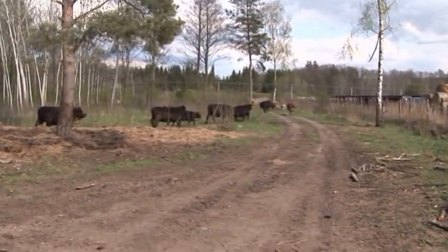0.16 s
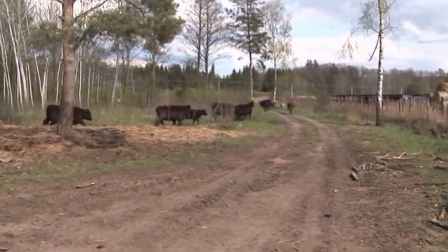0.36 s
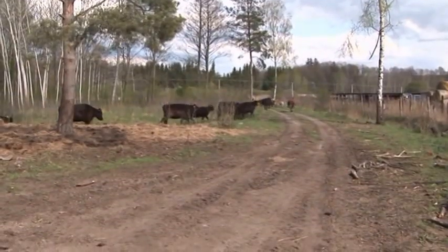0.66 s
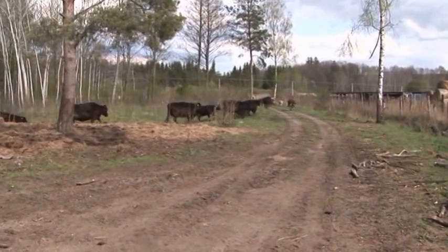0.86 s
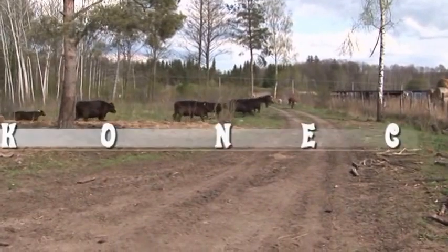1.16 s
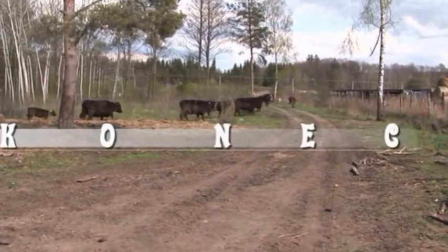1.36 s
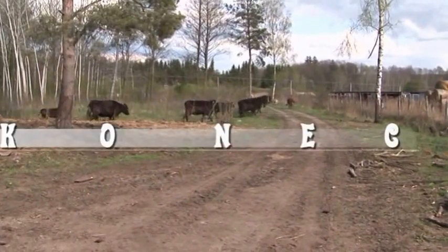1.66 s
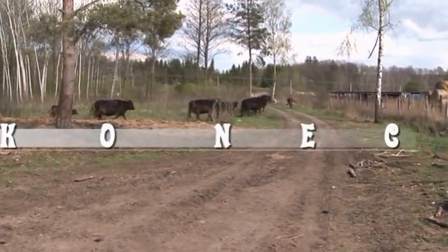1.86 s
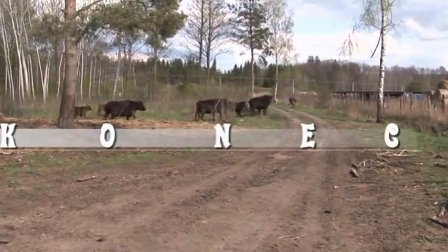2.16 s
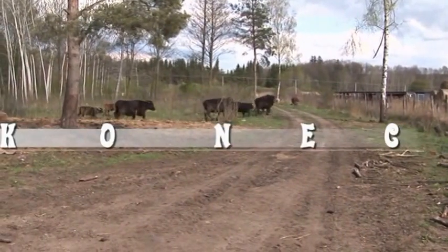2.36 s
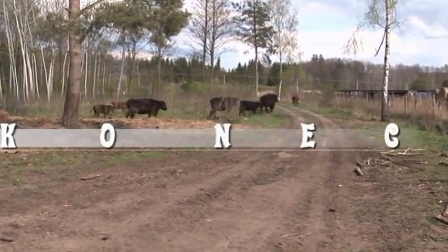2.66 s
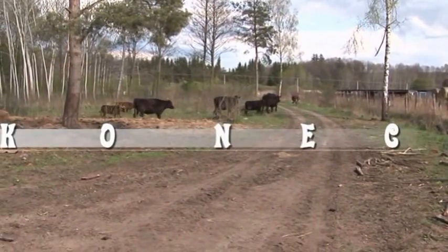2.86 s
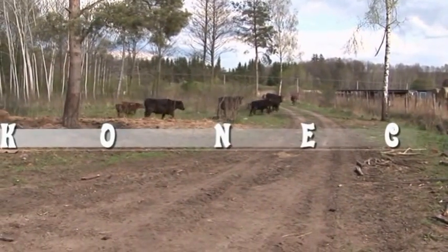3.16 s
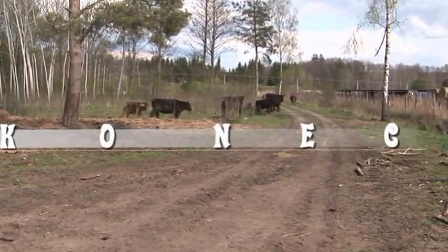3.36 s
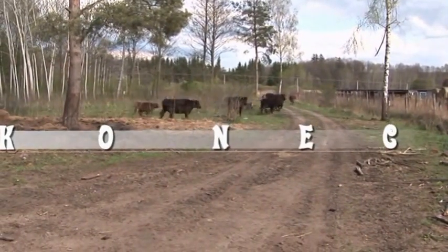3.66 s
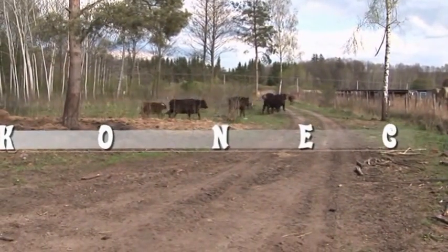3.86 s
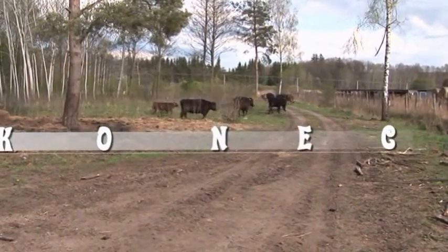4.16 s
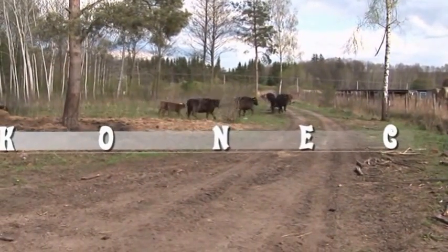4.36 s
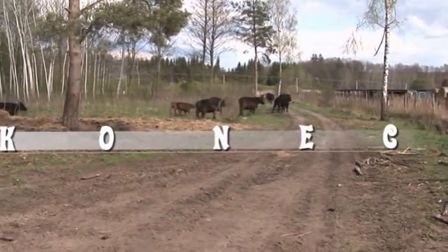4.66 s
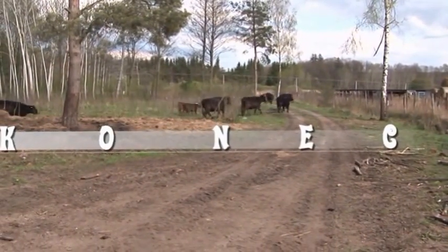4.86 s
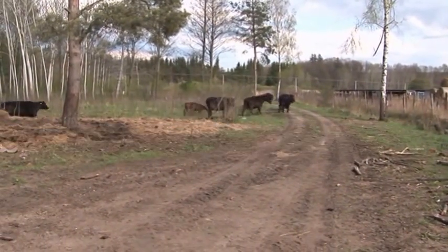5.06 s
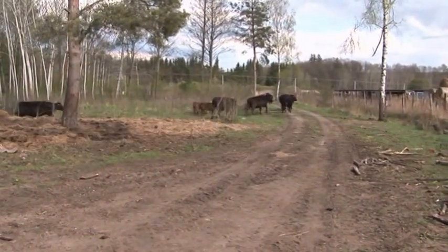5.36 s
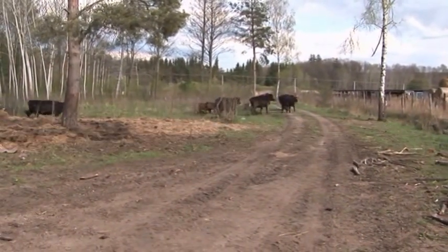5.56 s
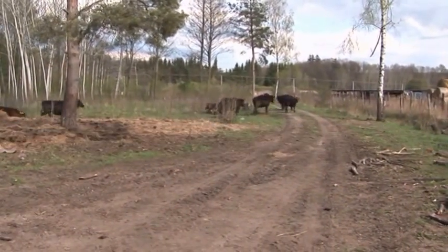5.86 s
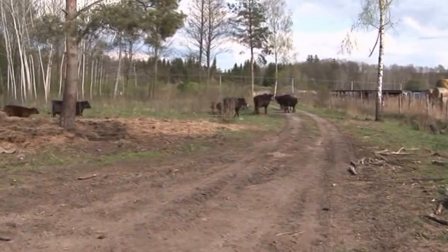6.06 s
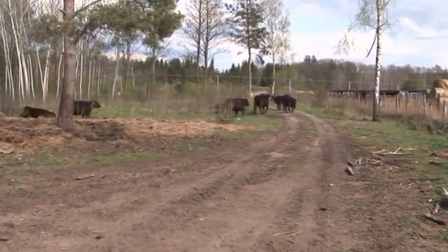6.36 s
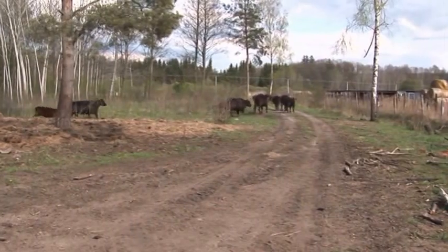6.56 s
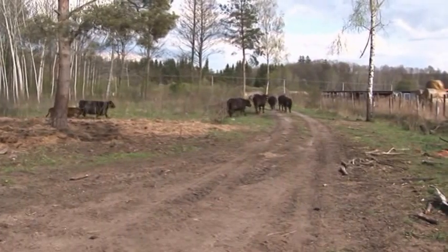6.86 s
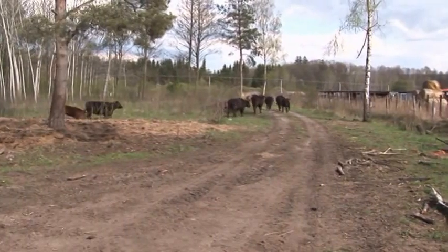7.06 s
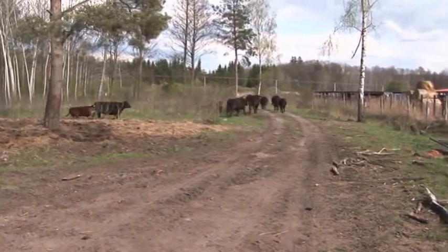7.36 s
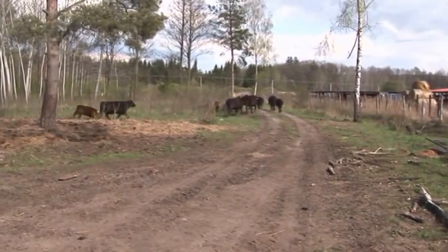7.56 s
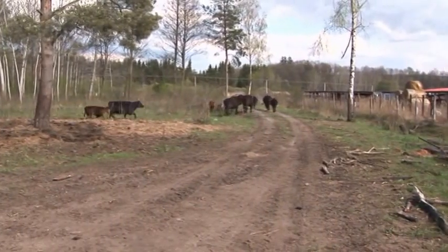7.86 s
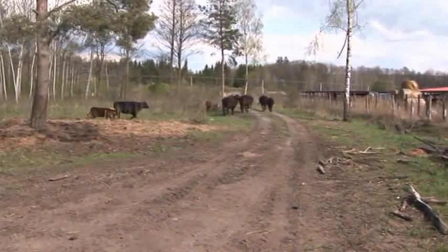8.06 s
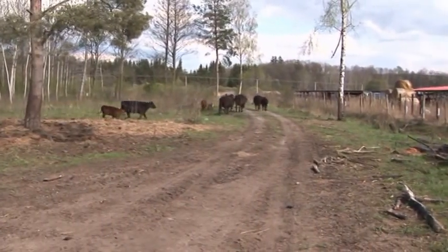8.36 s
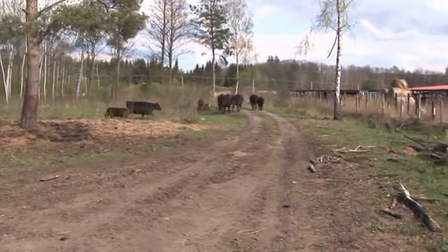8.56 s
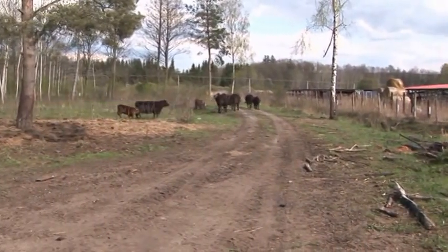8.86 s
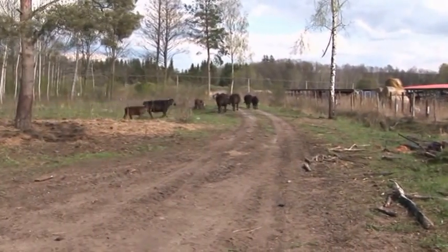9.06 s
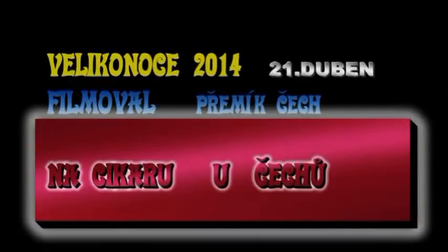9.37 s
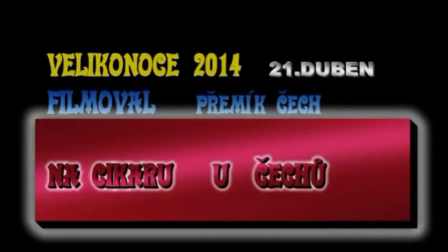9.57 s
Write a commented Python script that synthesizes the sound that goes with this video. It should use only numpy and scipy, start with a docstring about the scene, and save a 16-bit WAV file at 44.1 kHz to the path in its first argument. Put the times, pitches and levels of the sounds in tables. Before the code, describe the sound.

Cattle bellow at a distance throughout, slightly to the right, in overlapping, arching calls that echo from trees and blur into a hoarse wash. A strong, high call opens the first 0.7 seconds, and another high, raspy one comes at 3 seconds. Underneath, a diesel engine idles with a low rumble and light knocking to the left, over soft outdoor air. Dry twigs crackle, mostly in the first five seconds, and hooves knock on wood near 1.8, 4.3, 4.7 and 7 seconds. A small bird chirps faintly around 3 and 5.5 seconds. At about 4.6 seconds a close cow, straight ahead, growls upward into a short hoot at 5.3. It growls again and breaks into the loudest, low closed-mouth hoot from 6.8 to 7.2, then another from 8.2 to 8.7. A last brief growl comes just after 9 seconds.

```python
"""Cattle on a farm track by a wood

Far cows bellow in overlapping arcs that echo from the trees; a near cow growls upward and breaks into
loud, closed-mouth hoots. Each call is a stack of vocal-fold harmonics shaped by the mouth.
A diesel engine idles with exhaust rumble and cylinder knock. Dry twigs crackle, hooves knock on
branches and a small bird chirps over steady air."""
import sys
import numpy as np
from scipy import signal
from scipy.fft import rfft, irfft, next_fast_len
from scipy.io import wavfile

SR = 44100
rng = np.random.default_rng(int(sys.argv[2]) if len(sys.argv) > 2 else 0)


def log_audio(samples):
    """Write samples as a 16-bit WAV file to the path given in sys.argv[1]."""
    # one column per channel
    frames = np.atleast_2d(samples).T
    # limit to full scale, then quantise
    limited = np.clip(frames, -1, 1)
    pcm = np.round(limited * 32767).astype(np.int16)
    wavfile.write(sys.argv[1], SR, pcm)


N = 428211
TIME = np.arange(N) / SR
FFT_SIZE = next_fast_len(N + SR)
BINS_HZ = np.maximum(np.fft.rfftfreq(FFT_SIZE, 1 / SR), 1)
END_S = 9.248
CYCLE_HZ = 5.738   # four-stroke cycle rate
EDGE_DB = 16.5   # level drop at the edge of a call


def from_db(db):
    """Decibels to gain."""
    return 10 ** (np.asarray(db) / 20)


def rms_one(x):
    """Scale to unit power."""
    return x / np.sqrt(np.mean(x ** 2) + 1e-20)


def at_hz(points, hz):
    """Interpolate on a log-frequency axis."""
    known_hz, values = np.transpose(points)
    return np.interp(np.log(hz), np.log(known_hz), values)


def filtered(x, response):
    """Apply a response given on BINS_HZ."""
    return irfft(rfft(x, FFT_SIZE) * response, FFT_SIZE)[..., :N]


def pan(side_db):
    """Constant-power stereo gains; side_db is left minus right."""
    return rms_one(from_db(np.array([[side_db], [-side_db]]) / 2))


def wander(t, rate_hz):
    """Random drift between unit-normal knots."""
    knots = rng.standard_normal(4096)
    return np.interp((t - t[0]) * rate_hz, np.arange(len(knots)), knots)


def ramp(distance_s, length_s):
    """1 at the edge of a call, 0 from length_s on."""
    return np.clip(1 - distance_s / max(length_s, 1e-3), 0, 1)


def noise(colour, correlation, side_db):
    """Coloured stereo noise of unit power."""
    mid, side = rng.standard_normal((2, N))
    pair = np.sqrt(1 + correlation) * mid + np.sqrt(1 - correlation) * side * [[1], [-1]]
    return pan(side_db) * rms_one(filtered(pair, from_db(at_hz(colour, BINS_HZ))))


def air():
    """Steady air: mostly low noise."""
    # spectrum: (frequency [Hz], relative density [dB])
    colour = [(20, -22.5), (70, 0), (130, -3), (280, -1), (400, -12.5), (1000, -8), (3000, -22.5),
              (4000, -19), (7000, -52), (11500, -31.5), (15500, -51.5)]
    return noise(colour, correlation=1, side_db=3)


def herd_blur():
    """Voices scattered among the trees merge into a hoarse wash."""
    # envelope: (time [s], relative level [dB])
    envelope = [(0, -20.5), (.4, -21.5), (.7, -21.5), (1.55, -20.5), (2.2, -22.5), (2.7, -20.5),
                (3.45, -19), (4.5, -28.5), (5.3, -19.5), (6.25, -20.5), (7, -19), (7.6, -21.5),
                (8.7, -19.5), (9.2, -24)]
    # spectrum: (frequency [Hz], relative density [dB])
    colour = [(130, -23), (200, -8), (300, -8.5), (420, -7.5), (600, -1), (760, -3), (1000, 4), (1250, 5),
              (1480, -6), (1900, -3), (2500, -8.5), (3200, -15), (4200, -38.5)]
    time_s, level_db = np.transpose(envelope)
    return noise(colour, correlation=.25, side_db=-3) * from_db(np.interp(TIME, time_s, level_db))


def engine_rumble():
    """The exhaust repeats every four-stroke cycle; the firing orders stand out."""
    # exhaust spectrum: (frequency [Hz], level per order [dB])
    spectrum = [(15, -70), (24, -46), (110, -42.5), (140, -49), (200, -48), (260, -43.5), (320, -49),
                (380, -69.5)]
    # prominent orders: (multiple of the cycle rate, boost [dB])
    strong_orders = [(8, 13.2), (9, 2.1), (12, 6.3), (16, 7.8), (17, 8), (19, 2.5)]
    orders = np.arange(3, 66)
    level_db = at_hz(spectrum, orders * CYCLE_HZ)
    for order, boost_db in strong_orders:
        level_db += boost_db * (orders == order)
    cycle = np.linspace(0, 1, 2048)
    turns = np.outer(orders, cycle) + rng.random((len(orders), 1))
    wave = from_db(level_db) @ np.sin(2 * np.pi * turns)
    return np.sqrt(2) * np.interp(TIME * CYCLE_HZ % 1, cycle, wave)


def engine_knock(rise_s=.001, decay_s=.016, clatter_power=.11, lead_s=.017, uneven_db=1.74):
    """Four unequal cylinders shake the block in short bursts, over a steady clatter."""
    # firings: (place in cycle [0-1], relative level [dB])
    cylinders = [(0, 3), (.3, -4), (.55, -3.5), (.83, -5)]
    # spectrum: (frequency [Hz], relative density [dB])
    colour = [(350, -11.5), (650, -1), (1000, 0.5), (1500, 0), (2100, -7), (2600, 1.5), (3050, 1),
              (3600, -11.5), (4300, -9.5), (5000, -13), (5900, -11.5), (7000, -30), (15000, -31)]
    # engine well to one side: (frequency [Hz], left-ear lead [rad])
    left_lead = [(500, .5), (2000, 6.13), (3200, 6.3), (4000, 9.35)]
    power = clatter_power
    for place, level_db in cylinders:
        age_s = ((TIME + lead_s) * CYCLE_HZ - place) % 1 / CYCLE_HZ
        power += from_db(level_db) ** 2 * (1 - np.exp(-age_s / rise_s)) * np.exp(-age_s / decay_s)
    bursts = rms_one(np.sqrt(power) * from_db(uneven_db * wander(TIME, 60)))
    left, right = bursts * noise(colour, correlation=.68, side_db=3)
    return np.array([filtered(left, np.exp(1j * at_hz(left_lead, BINS_HZ))), right])


def moo(course, voice, jitter, rasp_hz, fade_s):
    """Vocal-fold harmonics glide through the resonances of the mouth."""
    # mouth bands: (frequency [Hz])
    mouth_hz = [120, 200, 300, 420, 600, 850, 1100, 1300, 1650, 2100, 2800]
    time_s, pitch_hz, level_db = np.transpose(course)
    side_db, rasp, closing_db_per_oct, mouth_db = voice
    span = (TIME > time_s.min()) & (TIME < time_s.max())
    t = TIME[span]
    hz = np.interp(t, time_s, pitch_hz) * (1 + jitter * wander(t, 45))
    phase = 2 * np.pi * np.cumsum(hz) / SR
    mouth = list(zip(mouth_hz, mouth_db)) + [(3500, mouth_db[-1] - 12)]
    # a closing mouth tilts the spectrum about its strongest resonance
    tilt_db_per_oct = closing_db_per_oct * np.linspace(.5, -.5, len(t))
    pivot_hz = mouth_hz[np.argmax(mouth_db)]
    # upper harmonics bloom with effort
    effort_db = np.interp(t, time_s, level_db)
    bloom_db_per_oct = .27 * (effort_db - np.percentile(effort_db, 70))
    harmonics = 0
    for k in range(1, int(3400 / pitch_hz.max()) + 1):
        octaves = np.clip(np.log2(k * hz / pivot_hz), -1, 1)
        slope_db = tilt_db_per_oct * octaves + bloom_db_per_oct * np.maximum(octaves, 0)
        gain = from_db(at_hz(mouth, k * hz) + slope_db)
        flutter = 1 + rasp * wander(t, rasp_hz)   # uneven fold closures
        harmonics += gain * flutter * np.sin(k * phase + rng.uniform(0, 2 * np.pi))
    edge_s = np.minimum(t - time_s.min(), time_s.max() - t)
    out = np.zeros(N)
    out[span] = np.sqrt(2) * harmonics * from_db(effort_db) * np.minimum(edge_s / fade_s, 1)
    return pan(side_db) * out


def bellow(start_s, length_s, first_hz, held_hz, last_hz, glide_s, fall_s, level_db, swell_db,
           attack_s, release_s, side_db, rasp, closing_db_per_oct, *mouth_db):
    """Course and voice of one arc: pitch glides to a held note, then away as the call runs out."""
    age_s = np.linspace(0, length_s, 200)
    remaining_s = length_s - age_s
    bend = 2.02
    onset_hz = (first_hz - held_hz) * ramp(age_s, glide_s) ** bend
    ending_hz = (last_hz - held_hz) * ramp(remaining_s, fall_s) ** bend
    edges = ramp(age_s, attack_s) ** 2 + ramp(remaining_s, release_s) ** 2
    db = level_db + swell_db * (age_s / length_s - .5) - EDGE_DB * edges
    course = np.column_stack([start_s + age_s, held_hz + onset_hz + ending_hz, db])
    return course, (side_db, rasp, closing_db_per_oct, mouth_db)


def far_cows():
    """Overlapping bellows from the right reach the left ear later."""
    # calls: (start [s], length [s], first pitch [Hz], held pitch [Hz], last pitch [Hz], glide [s],
    # fall [s], level [dB], swell [dB], attack [s], release [s], left-right [dB], rasp [0-1],
    # closing tilt [dB/oct], 11 mouth band gains [dB])
    bellows = [(-0.155, 0.85, 487.5, 552.5, 527, 0.38, 0.43, -11, 1.5, 0.48, 0.45, -6, 0.03, 0, -20.0, -20.0, -20.0, -17.5, -9.5, 7.5, 1.5, -37.0, -7, -15, -22),
               (-0.03, 0.72, 284.1, 282.2, 248.2, 0.16, 0.28, -24, -8, 0.022, 0.06, -3, 0.21, 2.5, -21.0, -12.5, -13.5, 10, -6, -2.0, -2, -1.5, -18.5, -13, -31.5),
               (0.235, 0.44, 275, 265.3, 242.3, 0.24, 0.31, -19.5, 1.5, 0.07, 0.03, -8, 0.24, 9, -18.0, -12.5, -26, -20.5, -11, -12.5, -23.5, -2.5, -16, -14, -25.0),
               (0.55, 0.79, 145.2, 212.5, 195.7, 0.45, 0.39, -24.5, 3, 0.098, 0.22, -2, 0.2, -5.0, -3, -1, -33, -12.5, -7.5, -7, -3.5, -6.5, -15, -20.5, -26),
               (0.8, 0.6, 286, 282, 269.4, 0.2, 0.297, -26, -2.5, 0.093, 0.12, -3.5, 0.12, 0, -24, -24, -17, -17, -12, 0, -8.5, -16, -20, -25, -30),
               (1.1, 0.735, 213.1, 219, 225, 0.5, 0.18, -30.75, -2.5, 0.02, 0.13, -0.5, 0.16, -2.0, -10.0, -4.0, 5.5, -18, -8.5, -1, -3.5, 1.5, -15, -5, -12),
               (1.18, 1.55, 164.6, 196.5, 156.1, 0.76, 0.56, -18.0, -7, 0.47, 0.42, -6.5, 0.14, 5.5, -14, -16.5, -13, -41, 0, -21, -3.5, -6.5, -14, -21.5, -18.5),
               (2.05, 0.625, 289.2, 314.8, 315.5, 0.29, 0.1, -24.5, 7.5, 0.02, 0.03, 1, 0.11, -2, -12.0, -12.0, -8, 3.5, -23.5, -22, -9, -14, -21, -26.5, -20),
               (1.99, 0.455, 208.6, 210.6, 204, 0.14, 0.174, -30.5, 4, 0.053, 0.15, -3.0, 0.1, -6, -10.0, -11.5, 5, -22, 1, -11, -4, -3, -7, -3.5, -8.5),
               (2.62, 0.93, 148.2, 169.2, 162.6, 0.92, 0.234, -29, -1.5, 0.41, 0.034, 0, 0.3, -7.5, -6, -2.5, -5.5, -21, 0, -12.5, -2, 1.0, -25, -15, -23.5),
               (3.035, 0.54, 656.2, 591.4, 583, 0.43, 0.08, -19, 6.5, 0.04, 0.087, -8.75, 0.42, 5.5, -21.0, -21.0, -21.0, -17.0, -22, -30.0, 0, -1.5, -16, -15, -32),
               (3.03, 1.11, 146.2, 215.5, 185, 0.58, 0.09, -27.0, 1.5, 0.066, 0.1, -1.5, 0.14, -5, -7.5, 1.5, -9, -18.5, 1, -7, -3, -9, -6, -14, -11.5),
               (3.22, 0.59, 177.8, 207.7, 169.5, 0.43, 0.18, -23.5, 4, 0.054, 0.15, -1, 0.17, -1.5, 5, -1.5, -29.5, -15.5, -4, -19, 2, -3, -18, -16.5, -29),
               (3.87, 0.48, 301.4, 322.7, 304, 0.36, 0.147, -28, 0, 0.14, 0.06, -5, 0.4, 0.5, -24.0, -24.0, -25, -23.5, -29, 2, -3.5, -28.5, -20, -31.0, -35.0),
               (4.995, 0.895, 147.8, 205.1, 171, 0.56, 0.17, -23.0, 0.0, 0.1, 0.05, -0.5, 0.34, -0.5, -9, 1, -21.5, -13.0, -3.5, -12, -6.5, -9, -13.5, -19.5, -23.5),
               (5.295, 1.9, 233.4, 255.4, 250.9, 0.6, 0.28, -24.0, -7, 0.33, 0.13, -5, 0.27, -6, -18.0, -16, -16, -19, -20, 1.0, -27.5, 2.5, -26, -16, -20),
               (5.695, 0.76, 211.1, 213.2, 168.3, 0.5, 0.1, -26.0, -0.5, 0.16, 0.02, -1, 0.12, 3.5, -3, 0.5, -7.0, -24.5, -2, -18.0, -2.5, -10, -4, -14, -11),
               (5.915, 0.75, 167.1, 193.6, 173.5, 0.45, 0.28, -16, 2, 0.41, 0.27, -6.5, 0.07, -2, -17.5, -20.0, -31.5, -34, -1, -15.5, -5.5, -2.5, -11.5, -13.5, -18),
               (5.96, 1.035, 312.2, 330.0, 297.4, 0.44, 0.32, -22.0, 0.5, 0.17, 0.21, -4, 0.19, -3.5, -22.0, -22.0, -14.5, -24, -3, -11.0, -7.5, 2, -13.5, -13.0, -22),
               (7.16, 0.86, 151.2, 194.4, 160, 0.54, 0.15, -21, 1.5, 0.19, 0.07, -2, 0.33, 3, -4.5, 0, -52.5, -8, -4, -16.0, -3, -9.5, -17, -20.5, -26),
               (7.165, 0.63, 299.3, 340.0, 294, 0.51, 0.12, -21.5, -7.5, 0.12, 0.03, -7.5, 0.08, 12, -20.0, -20.0, -12, -12, -6, -1.5, -10.0, 0.5, -9, -21, -26.5),
               (7.75, 0.95, 162.4, 211.9, 207.2, 0.6, 0.19, -24.5, 10, 0.053, 0.23, -2, 0.24, 0.5, 5.5, 0.5, -19.5, -13.5, -5, -8, -4.5, -6, -9.5, -17, -15),
               (8.88, 0.39, 623.3, 641.6, 640.0, 0.46, 0.046, -24.5, 1, 0.2, 0.02, -2.5, 0.17, 6, -20.0, -18.0, -20.0, -14.0, -6.5, -12.0, -4, 0.5, -8.5, -6.5, -19.0)]
    # (frequency [Hz], left-ear lag [rad])
    left_lag = [(200, .05), (600, 1.07), (1300, 1.38), (2500, .4)]
    left, right = sum(moo(*bellow(*row), jitter=.0015, rasp_hz=110, fade_s=.03) for row in bellows)
    return np.array([filtered(left, np.exp(-1j * at_hz(left_lag, BINS_HZ))), right])


def wood_echo(x, t60_s, build_s):
    """Trunks scatter a dying echo, different in each ear."""
    t = TIME[:SR]
    impulse = rng.standard_normal((2, SR)) * from_db(-60 * t / t60_s) * (1 - np.exp(-t / build_s))
    return filtered(x, rfft(rms_one(impulse) / np.sqrt(SR), FFT_SIZE))


def twigs(strain_s=.01, snap_s=.0025, splinter_s=.058, splinter_db=-11, grain_db=4):
    """A twig crackles as it bends, snaps, then splinters in fine grains."""
    # main snaps: (time [s], relative peak [dB])
    loud_snaps = [(0.404, -22), (0.8207, -23.5), (1.6013, -27), (1.6431, -28), (1.8672, -26),
                  (1.908, -17.5), (2.3601, -21), (2.4544, -27), (2.8949, -26), (3.407, -18), (3.727, -18),
                  (3.9589, -25), (4.0842, -25), (4.2675, -25), (5.048, -23), (7.9788, -25), (8.071, -22)]
    # spectrum: (frequency [Hz], relative density [dB])
    colour = [(2000, -17), (5000, 2.5), (7500, -9.5), (11000, 2.5), (15500, 0)]
    faint_snaps = [(rng.uniform(0, END_S), rng.normal(-31, 6)) for _ in range(8)]
    envelope = np.zeros(N)
    for time_s, peak_db in loud_snaps + faint_snaps:
        span = np.abs(TIME - time_s) < .2
        age_s = TIME[span] - time_s
        snap = (age_s > 0) * np.exp(-np.abs(age_s) / snap_s)
        splinters = np.exp(-np.abs(age_s) / np.where(age_s > 0, splinter_s, strain_s))
        envelope[span] += from_db(peak_db) * (snap + from_db(splinter_db) * splinters)
    grains = from_db(grain_db * wander(TIME, 400))
    return envelope * grains * noise(colour, correlation=.26, side_db=5)


def hooves(decay_s=.0093):
    """A hoof on dry wood gives a brief, dull crack."""
    # hoof strikes: (time [s], peak [dB])
    knocks = [(1.794, -27), (4.267, -30), (4.746, -29), (7.037, -23)]
    # spectrum: (frequency [Hz], relative density [dB])
    colour = [(800, -7), (3000, 2.5), (5800, -5.5), (7500, -21), (15000, -25)]
    envelope = sum(from_db(peak_db) * (TIME > time_s) * np.exp(-np.abs(TIME - time_s) / decay_s)
                   for time_s, peak_db in knocks)
    return envelope * noise(colour, correlation=.55, side_db=2)


def bird(period_s=.12, chirp_s=.08, sag_hz_per_s=160, fade_db_per_s=10, warble=.0073):
    """Even runs of warbling whistles, each lower and softer than the last."""
    # song: (start [s], length [s], first pitch [Hz], first level [dB])
    phrases = [(2.95, .78, 4600, -43), (4.9, .06, 7510, -57), (5.48, .3, 4620, -46)]
    out = np.zeros(N)
    for start_s, length_s, first_hz, first_db in phrases:
        for age_s in np.arange(0, length_s, period_s):
            span = (TIME > start_s + age_s) & (TIME < start_s + age_s + chirp_s)
            hz = (first_hz - sag_hz_per_s * age_s) * (1 + warble * wander(TIME[span], 157))
            gain = np.sqrt(2) * from_db(first_db - fade_db_per_s * age_s)
            out[span] += gain * np.hanning(len(hz)) * np.sin(2 * np.pi * np.cumsum(hz) / SR)
    return out


def growl(end_s, length_s, top_hz, top_db):
    """Course of a growl: pitch creeps up, then climbs fast, louder as it rises."""
    creep_hz_per_s, climb_hz_per_s, climb_s = 50, 285, .275
    swell_db_per_oct, release_s = 11, .051
    remaining_s = np.linspace(length_s, 0, 200)
    hz = top_hz - climb_hz_per_s * np.minimum(remaining_s, climb_s)
    hz -= creep_hz_per_s * np.maximum(remaining_s - climb_s, 0)
    db = top_db + swell_db_per_oct * np.log2(hz / top_hz) - EDGE_DB * ramp(remaining_s, release_s) ** 2
    return np.column_stack([end_s - remaining_s, hz, db])


def near_cow():
    """Four rising growls; in the first three the voice breaks into a closed-mouth hoot."""
    # growls: (end [s], length [s], top pitch [Hz], relative top level [dB], voice)
    # voice: (left-right [dB], rasp [0-1], closing tilt [dB/oct], mouth band gains [dB])
    growls = [ (5.31, .76, 170, -18.5, (-.5, .17, -6.5, [0, -1.5, -6, -8.5, -17, -31, -32, -30, -34, -34, -24])),
              (6.79, .42, 168, -15, (-.5, .3, -4.5, [-5, 2, -5, -11, -17, -32, -33, -10, -47, -29.5, -33])),
              (8.19, .31, 172.7, -19, (-.5, .2, -2.5, [-4.5, 8.5, -2.5, -9, -4, -44, -9, -21.5, -38, -32, -24])),
              (9.29, .13, 189.3, -25, (-.5, 0.29, -2, [-5, 6.5, -9.5, -10, -10, -7, -18, -10, -21, -20, -36]))]
    # hoot courses: (time [s], pitch [Hz], relative level [dB])
    short_hoot = [(5.27, 207, -22), (5.31, 213.5, -17.5), (5.36, 213, -14), (5.43, 175, -15.5)]
    loud_hoot = [(6.755, 234.4, -23), (6.775, 230.2, -4.5), (6.8, 214, -9), (6.91, 205.2, -1.5),
                 (6.96, 201, -7), (7.08, 196.5, -2), (7.15, 202, -4), (7.18, 198, -8.5), (7.24, 197.4, -27)]
    long_hoot = [(8.145, 209.3, -35), (8.175, 212.5, -9), (8.25, 205.2, -14), (8.39, 199, -8),
                 (8.48, 207.8, -7.5), (8.56, 208.3, -4.5), (8.63, 209.2, -5.5), (8.67, 203.8, -22),
                 (8.75, 201.3, -23.5)]
    calls = [(growl(*rise), voice) for *rise, voice in growls] + [
        (short_hoot, (0, .2, 3, [-8.5, .5, -17, -11.5, -36, -26.5, -34, -28, -42, -45, -41])),
        (loud_hoot, (.3, .16, -4, [-5, -1.5, -4.5, -19, -34, -28.5, -26.5, -27.5, -45, -38, -37.5])),
        (long_hoot, (.3, .097, .5, [-3.5, .5, -3.5, -10.5, -24, -31, -25.5, -25.5, -34, -37.5, -33]))]
    return sum(moo(course, voice, jitter=.005, rasp_hz=90, fade_s=.014) for course, voice in calls)


def scene():
    """Far herd right, near cow ahead, engine left."""
    far, near = far_cows(), near_cow()
    far_echo = from_db(-12) * wood_echo(far, t60_s=.9, build_s=.02)
    near_echo = from_db(-32) * wood_echo(near, t60_s=.77, build_s=.03)
    cattle = far + far_echo + from_db(-.4) * near + near_echo
    engine = engine_rumble() + from_db(-27) * engine_knock()
    ground = from_db(-8) * twigs() + hooves()
    background = from_db(-33.5) * air() + from_db(-2) * herd_blur()
    return background + engine + cattle + ground + bird()


def record(dry):
    """Clip at full scale, stop abruptly, cut the top treble."""
    stop = np.clip((END_S - TIME) / .008 + 1, 0, 1)
    lowpass = signal.cheby2(16, 70, 16300, fs=SR, output="sos")
    return signal.sosfilt(lowpass, np.clip(dry, -1, 1) * stop)


dry = scene()
out = record(dry)
log_audio(out)
```